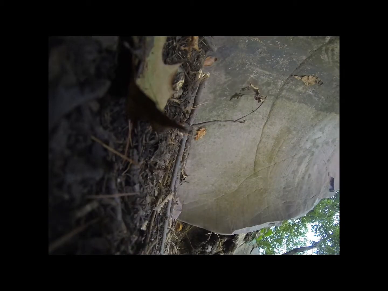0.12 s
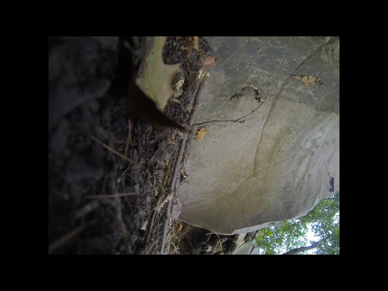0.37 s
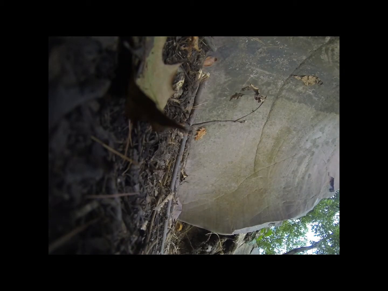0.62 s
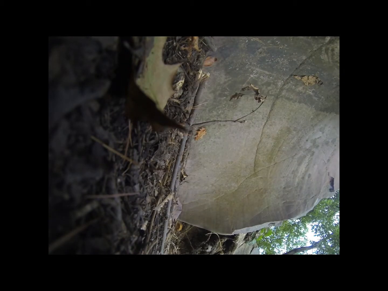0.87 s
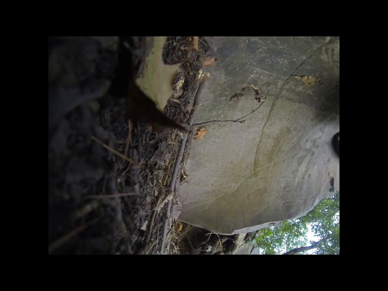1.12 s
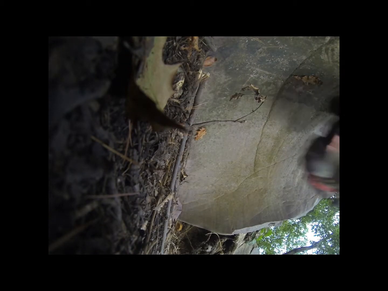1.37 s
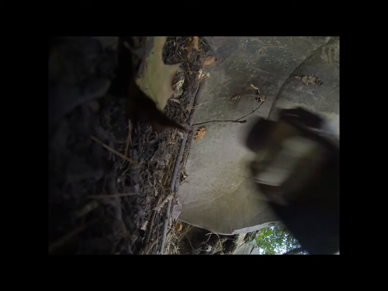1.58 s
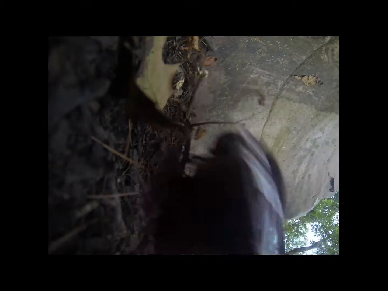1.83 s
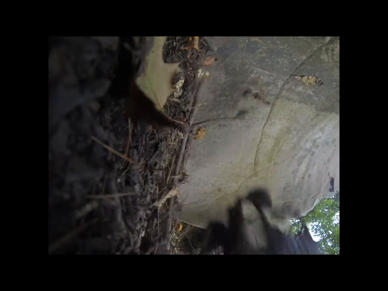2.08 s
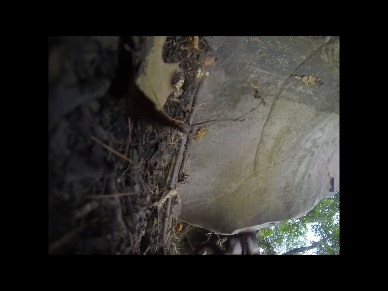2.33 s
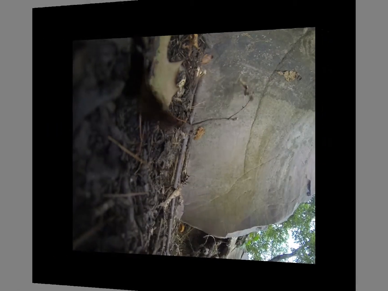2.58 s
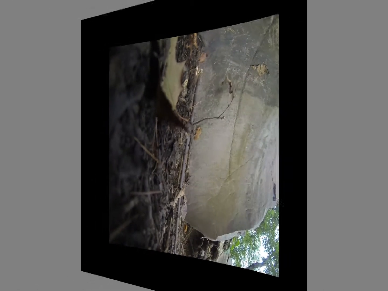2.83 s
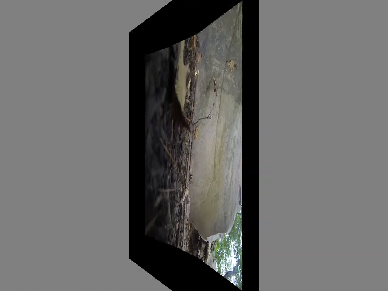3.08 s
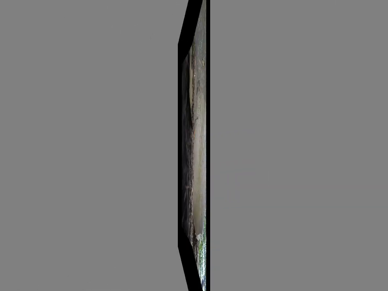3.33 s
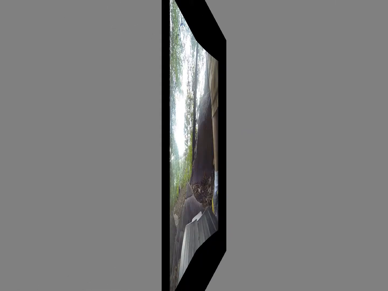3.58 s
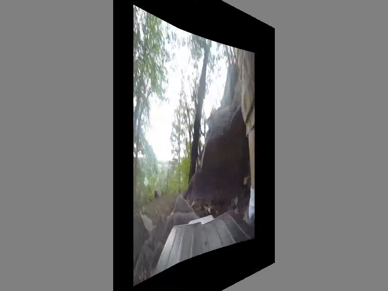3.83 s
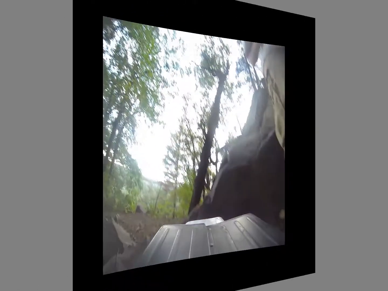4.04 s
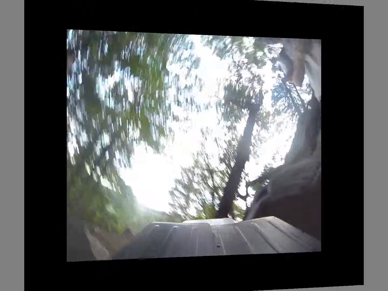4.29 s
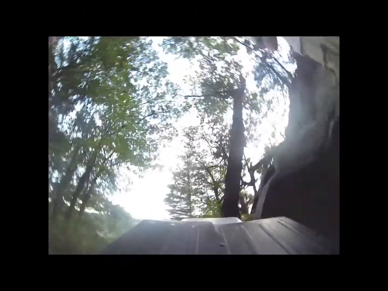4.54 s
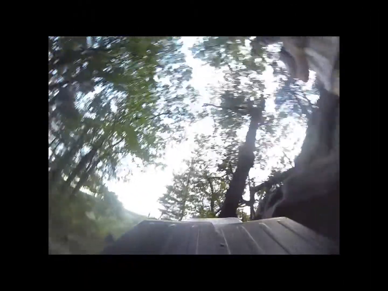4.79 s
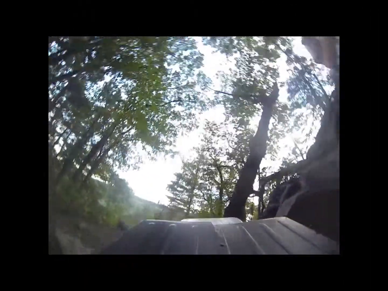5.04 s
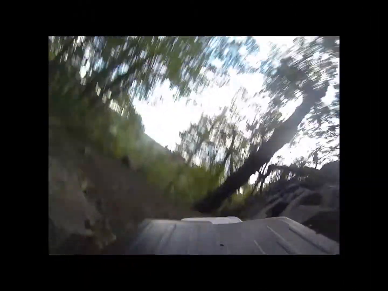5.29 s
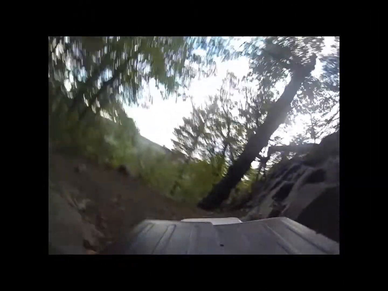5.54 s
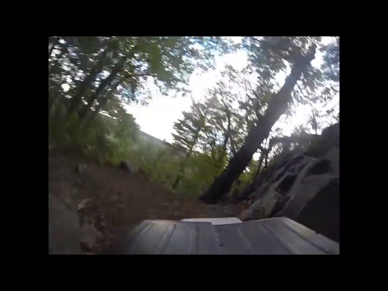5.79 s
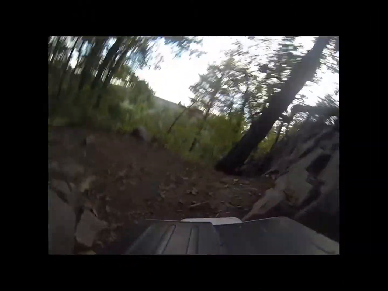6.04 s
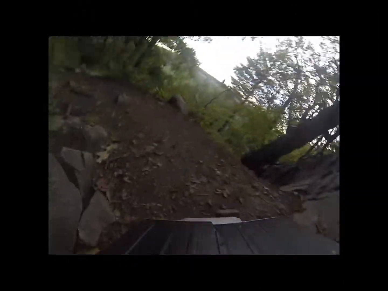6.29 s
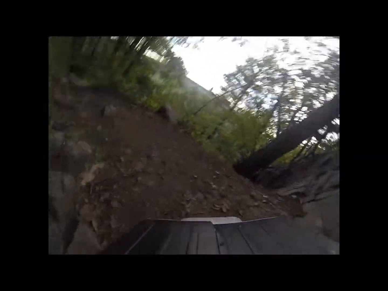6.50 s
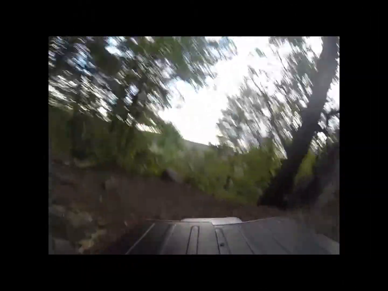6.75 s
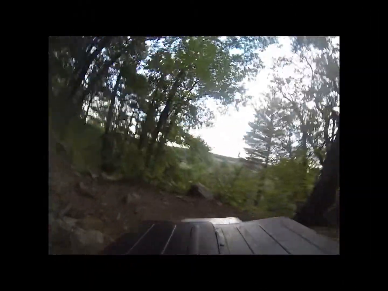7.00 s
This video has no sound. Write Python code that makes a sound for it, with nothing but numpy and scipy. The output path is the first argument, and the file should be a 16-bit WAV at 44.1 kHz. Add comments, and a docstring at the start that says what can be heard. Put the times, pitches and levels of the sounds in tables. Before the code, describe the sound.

Sound is muffled and boxy, picked up inside a shut plastic case on a rocky trail. From 0 to 3.5 seconds all is slowed and dull: faint bassy hiss and a thin pulsing whine, with small scuffs and ticks. Around 0.8 a modest thud, scrape and stone clack; little taps follow at 1.1 to 1.7. At 1.8 to 1.9 the toy truck passes in a loud crush of scraping, low thuds and ringing plastic clatter, fading by 2.1. Faint scrapes and taps near 2.6 to 2.9, then almost quiet. At about 3.5 the onboard ride swells in quickly, full and bright: shaking low rumble, chassis drone, tyres grinding, grit, and whirring gears squeaking most at 3.8 to 4.3. From 4.2 hollow case knocks come thick and irregular. The rumble dips and surges over stones, lighter around 6.2 to 6.4, with strong knocks at 6.5 and 6.8, still rolling at 7.1.

```python
"""A toy crawler truck on a rocky trail, heard by a small camera in a closed plastic case, in two shots.
First, slowed down: the truck scrapes and thuds past the camera on the ground, flicking stones and twigs at it.
Then, at speed, the camera rides on the truck: its mount shakes, tyres and grit rub, gears grind and squeak,
and the loose case knocks. Rubbing and knocks ring the case; shaped noise makes the thuds, drone and hiss.
The camera's circuit whines faintly in both shots, a tone in quick bursts."""
import sys
import numpy as np
from scipy import signal
from scipy.fft import rfft, irfft, next_fast_len
from scipy.io import wavfile
from scipy.ndimage import uniform_filter1d

SR = 44100
rng = np.random.default_rng(int(sys.argv[2]) if len(sys.argv) > 2 else 0)


def natural_amplitude(level_db):
    """Convert a level in decibels to a linear amplitude factor, elementwise."""
    exponent = np.asarray(level_db, float) / 20
    return 10 ** exponent


def output_pcm(signal):
    """Save a mono or channel-first signal as 16-bit PCM at the path in sys.argv[1].

    Samples are clipped to [-1, 1] before scaling.
    """
    pcm = np.clip(np.atleast_2d(signal).T, -1, 1) * 32767
    wavfile.write(sys.argv[1], SR, np.round(pcm).astype(np.int16))


N = 314433  # samples
T = np.arange(N) / SR  # seconds
SLOWDOWN, CUT_S = 2.5, 3.472  # first shot: times slower than life, and its end


def curves(rows):
    """The columns of a table, joined by straight lines in time."""
    time_s, *columns = np.transpose(rows)
    return [np.interp(T, time_s, column) for column in columns]


def unit(x):
    """Scales a sound to rms 1."""
    return x / np.sqrt(np.mean(x ** 2))


def coloured(points):
    """Noise whose spectrum follows (pitch_hz, level_db) points, at rms 1."""
    hz, db = np.transpose(points)
    f = np.arange(N // 2 + 1) * SR / N + 1
    shape = natural_amplitude(np.interp(np.log(f), np.log(hz), db, -90, -90))
    return unit(irfft(rfft(rng.standard_normal(N)) * shape, N))


def walk(rate):
    """Random levels, a new one rate times a second with a straight slide between; spread near 1."""
    k = int(SR / rate)
    steps = np.repeat(rng.standard_normal(N // k + 1), k)
    return unit(uniform_filter1d(steps, k)[:N])


def swells(rows, rise_db_s, rest_db):
    """Level in dB of (peak_s, level_db, fade_db_per_s) events that rise and die away over a resting level."""
    power = natural_amplitude(rest_db) ** 2 + np.zeros(N)
    for s, db, fade_db_s in rows:
        below_peak_db = np.where(T < s, rise_db_s * (s - T), fade_db_s * (T - s))
        power += natural_amplitude(db - below_peak_db) ** 2
    return 10 * np.log10(power)


def ring_of(modes, low_hz, high_hz, rise_cycles):
    """The answer to a tap of the modes between two pitches; the soft plastic takes a moment to give way."""
    t = np.arange(4096) / SR
    ring = np.zeros(4096)
    for k, (hz, width_hz, db) in enumerate(modes):
        if low_hz < hz < high_hz:
            give = (1 - np.exp(-hz * t / rise_cycles)) ** 2
            fade = np.exp(-np.pi * width_hz * t)
            ring += (-1) ** k * natural_amplitude(db) * give * fade * np.sin(2 * np.pi * hz * t)
    return ring / np.abs(ring).max()


def rubbing(ring, per_s, spread):
    """Tiny contacts of very unequal size (spread in dB) ring the case, at rms 1."""
    size = natural_amplitude(spread * np.minimum(rng.exponential(1, N), 4)) * rng.standard_normal(N)
    contacts = size * (rng.random(N) < per_s / SR)
    return unit(signal.fftconvolve(contacts, ring)[:N])


def taps(rows, low, high, chatter):
    """A firm first contact, then a chatter that dies away; both sets of modes get the same push."""
    out, t = np.zeros(N + 8192), np.arange(4096) / SR
    chance = rng.standard_normal((len(rows), 4096))
    for (s, db, treble_db, ms), noise in zip(rows, chance):
        push = (t == 0) + chatter * noise * np.exp(-t * 1000 / max(ms, .1))
        dull = signal.fftconvolve(push, low)
        bright = signal.fftconvolve(push, high)
        sound = dull / np.abs(dull).max() + natural_amplitude(treble_db) * bright / np.abs(bright).max()
        out[int(s * SR):][:len(sound)] += natural_amplitude(db) * sound
    return out[:N]


# Resonances of the case lying on the ground, as heard slowed: pitch_hz, width_hz, level_db (relative)
GROUND_RESONANCES = [(262.4, 60, -12.5), (445, 47, -9), (530, 75, -1), (587, 55.6, -2), (689.5, 58.4, -1),
                     (844, 66, -14), (945, 107, -6.5), (1400, 130, 3), (1560, 91, -3.5), (1770, 280, -2.5),
                     (2264, 60, -7.5), (2598, 140, -6), (3047, 120, -10), (3590, 340, -13),
                     (4350, 190, -23), (5130, 190, -25.5)]


def ground_case_rings():
    """The plastic case on the ground rings at set pitches when touched: a low and a high group."""
    return ring_of(GROUND_RESONANCES, 0, 1150, .2), ring_of(GROUND_RESONANCES, 1150, SR, .2)


# Shell and tyres meeting the rock, slowed: peak_s, scrape_db, brightness_db (treble over scrape),
# weight_db (body over scrape), fade_db_per_s
ROCK_SCRAPES = [(0.0, -40, -15, -5, 110), (0.39, -48, -18.5, -1.5, 90), (0.47, -53, -26, -3, 161),
                (0.6, -48.5, -13, -13, 250), (0.7, -61, -28, -4, 293), (0.75, -43, -6, -7.5, 102),
                (0.787, -30, -9, 3, 80), (0.9, -35, -20, 3, 125), (1.086, -45, -5, 0, 299),
                (1.12, -43.5, -16, -8, 248), (1.2, -57, -3, 6, 84), (1.29, -53, -10, -14, 200),
                (1.51, -55.5, -10, -4, 206), (1.662, -48, -8.5, 5, 99), (1.74, -43.5, -10, -6, 151),
                (1.781, -29, -9.5, -3.5, 201), (1.825, -15.5, -12, -2.5, 132), (1.92, -24.5, -24, -8, 211),
                (1.99, -36.5, -16.5, -2, 98.5), (2.029, -32.5, -22, -0.5, 169),
                (2.101, -44.5, -11, -8, 118.5), (2.32, -62.5, -12, -15, 151.5),
                (2.63, -69, -9.5, 0.5, 147.5), (2.71, -60, -6, 14.5, 120), (2.83, -43.5, -11.5, -4.5, 99.5),
                (2.869, -38.5, -15, -1.5, 122), (3.19, -50, -8, -7.5, 45), (3.28, -57, -19, -15, 197),
                (3.33, -47.5, -9, -15, 27.5), (3.46, -46.5, -6, -26, 47.5)]


def scrapes(low, high):
    """Tyres and shell rub the rock in many tiny contacts, with a noisy body under them."""
    rise_db_s = 898.5
    scrape_db = swells([(s, db, fade) for s, db, _, _, fade in ROCK_SCRAPES], rise_db_s, -72)
    # the treble fades 1.2 times as fast
    treble_rows = [(s, db + bright, fade * 1.2) for s, db, bright, _, fade in ROCK_SCRAPES]
    treble_db = swells(treble_rows, rise_db_s, -85.5)
    body_db = swells([(s, db + weight, fade) for s, db, _, weight, fade in ROCK_SCRAPES], rise_db_s, -73)
    scuff_db = 2.5 * walk(45)  # the shell catches and lets go
    dull = natural_amplitude(scrape_db + scuff_db) * rubbing(low, 1500, 4.0)
    bright = natural_amplitude(treble_db + scuff_db) * rubbing(high, 3000, 0.94)
    body = coloured([(100, -47.5), (160, -3.5), (250, -0.5), (330, 5.5), (450, -11.5), (700, 11.0)])
    return dull + bright + natural_amplitude(body_db) * body


# The truck landing: peak_s, level_db, fade_db_per_s
LANDINGS = [(0.0, -45, 300), (0.785, -29, 898), (1.15, -50, 97), (1.785, -32.5, 99.5), (1.82, -26, 99.5),
            (1.9, -20, 301), (2.03, -47, 250), (2.63, -52.5, 300), (2.74, -46.5, 99), (3.3, -53.5, 297)]


def thuds():
    """The truck's landings come through the ground as short swells of low noise."""
    rumble = coloured([(15, -4), (40, -2.5), (90, -6.5), (150, -18.0), (250, -45)])
    return natural_amplitude(swells(LANDINGS, rise_db_s=1199, rest_db=-64.5)) * rumble


# Colour of the slowed hiss: pitch_hz, level_db (per Hz, relative)
SLOWED_HISS = [(25, -9), (170, -18.5), (520, -19), (660, -18), (800, -23), (1700, -31.5), (3000, -34),
               (4500, -47), (5300, -44), (5500, -81.5)]


def slowed_hiss():
    """A steady faint noise, strongest in the bass."""
    return natural_amplitude(-60.5) * coloured(SLOWED_HISS)


def whine(slow, centre_s, db, octave_db):
    """The circuit's tone leaks in bursts, once a picture; slowing lowers both its pitch and burst rate."""
    bursts_per_s, burst_share, whine_hz = 47.95 / slow, .4, 6449.5 / slow
    phase = (T - centre_s) * bursts_per_s
    inside = np.abs(phase - np.round(phase)) < burst_share / 2
    on = uniform_filter1d(1. * inside, int(20 * slow))  # softened edges
    turn = 2 * np.pi * whine_hz * T
    return natural_amplitude(db) * on * (np.sin(turn) + natural_amplitude(octave_db) * np.sin(2 * turn))


# Stones and twigs flicked against the case, slowed: start_s, level_db, treble_db (over the dull part),
# chatter_ms (time to fade to about a third)
STONE_FLICKS = [(0.37, -42.5, -7, 7.4), (0.749, -37.5, 4, 6), (0.78, -24, -0.5, 22),
                (0.801, -11.5, -11, 13), (0.851, -18.5, -16, 14), (0.875, -24, -36, 5.7),
                (1.092, -38, 2.5, 6.9), (1.121, -26, -38, 13), (1.259, -38.5, -12, 5),
                (1.363, -23, -9, 2.7), (1.663, -31, -11.5, 10), (1.78, -5, -5.5, 9),
                (1.793, -9.5, -27, 9.3), (1.816, -9, -0.5, 9.8), (1.822, -4, -4, 4.7),
                (1.832, 1, -7.5, 15.5), (1.844, -3.5, -16, 21), (1.862, -5.5, -8.5, 8.6),
                (1.929, -19.5, -15, 15), (2.028, -33.5, -8, 7.1), (2.094, -58, 15, 8.9),
                (2.486, -43.5, -17, 7.6), (2.612, -45, 1, 4.6), (2.709, -41, -27, 12),
                (2.877, -34.5, -6.5, 16), (3.189, -54, 13.5, 13.5), (3.361, -40, -5, 12)]


def flicks(low, high):
    """Stones and twigs strike the case and chatter briefly, making it ring."""
    return taps(STONE_FLICKS, low, high, chatter=0.24)


def slowed_shot():
    """Scrapes, thuds, hiss and flicks; slowing pulls the top of the microphone's range down too."""
    low, high = ground_case_rings()
    x = scrapes(low, high) + thuds() + slowed_hiss() + flicks(low, high)
    return signal.sosfilt(signal.butter(8, 5900, fs=SR, output="sos"), x)


# How hard the wheels work the ground: time_s, level_db
ROLLING_LEVEL = [(3.47, -41.5), (3.52, -23), (3.6, -7), (3.65, -1.5), (3.69, 0.5), (4.2, 2), (4.6, -1),
                 (5.0, -0.5), (5.5, -3), (6.1, -2), (6.3, -8.5), (6.45, -4.5), (6.6, -1), (6.85, -2),
                 (7.13, -6.5)]
# The wheels go light over a crest: middle_s, half_length_s, depth_db
CREST_LIFTS = [(4.383, 0.058, 13.5), (4.449, .03, 9.5), (4.681, 0.1, 3), (5.042, 0.065, 3),
               (5.189, 0.066, 6.5), (5.333, 0.052, 10), (5.416, 0.064, 9.5), (5.537, 0.039, 7.5),
               (5.89, 0.066, 8.5), (6.181, .05, 8.5), (6.409, 0.062, 5), (6.883, 0.066, 3.5),
               (7.004, .05, 13.5)]


def wheel_load():
    """The rolling level in dB, dipping where the wheels go light."""
    load_db = curves(ROLLING_LEVEL)[0]
    for s, half_length, depth_db in CREST_LIFTS:
        load_db = load_db - depth_db * np.cos(np.pi * np.clip((T - s) / half_length, -1, 1) / 2) ** 2
    return load_db


# Wheels hitting stones: peak_s, heave_db (of the mount), grind_db (under the tyres), over the rolling level
STONE_BUMPS = [(3.682, 13, 6), (3.81, 3.5, 3), (3.87, -7, 3.5), (3.941, 9.5, 3), (4.05, 7, -3),
               (4.241, 4, 4), (4.33, 9.5, 8), (4.42, 7.5, -1.5), (4.468, 5.5, 9), (4.509, 3, 9.5),
               (4.6, 3.5, -3), (4.73, 6, -1.5), (4.79, 2.5, -1), (4.949, 5, 3), (5.16, 12.5, 7.5),
               (5.229, 6, 9), (5.261, 2.5, 8.5), (5.299, 11.5, 2), (5.37, 3, 7.5), (5.452, 13.5, 8.5),
               (5.5, 9.5, -5), (5.56, 4.5, 8.5), (5.599, 7.5, 7), (5.7, 3, -8), (5.79, 1, 6),
               (5.841, 10.5, 4), (5.96, 2, 1), (6.011, 9, 7), (6.068, 6.5, 4.5), (6.148, 16, 6),
               (6.228, 12, -12), (6.29, 5.5, -1.5), (6.46, -3.5, 4.5), (6.511, 12.5, 14.5),
               (6.548, -0.5, 12.5), (6.6, 9.5, -9), (6.691, -2, 8), (6.77, 4, 11.5), (6.835, 4, 0.5),
               (6.969, 13.5, 9.5), (7.05, -1, 1)]


def wheel_bumps():
    """Each stone lifts the levels in dB of the mount's heave and the tyres' grind above the wheel load."""
    load_db = wheel_load()
    heave_db = load_db + swells([(s, db, 253) for s, db, _ in STONE_BUMPS], 352, 0)
    grind_db = load_db + swells([(s, db, 204) for s, _, db in STONE_BUMPS], 700, 0)
    return heave_db, grind_db


# Colour of the mount's shaking: pitch_hz, level_db (per Hz, relative)
MOUNT_SHAKE = [(18, -36.5), (30, 3.5), (45, -2), (65, -10), (90, -19), (130, -60.5)]


def shaking(heave_db):
    """The sprung mount keeps swinging: its pitch wanders more than its size."""
    swing = coloured(MOUNT_SHAKE)
    size = uniform_filter1d(np.abs(signal.hilbert(swing, next_fast_len(N))[:N]), 600)
    return natural_amplitude(-16 + heave_db) * unit(swing / size ** 0.69)  # power 1 would make the size even


# Colour of the chassis drone: pitch_hz, level_db (per Hz, relative)
CHASSIS_DRONE = [(90, 0), (125, 3), (150, -4.5), (187, 0.5), (225, -9.5), (265, -3.5), (320, -4),
                 (400, -17.5), (600, -15.5)]


def drone(heave_db, grind_db):
    """The chassis hums as low noise that follows both heave and grind."""
    level_db = -33 + 0.46 * heave_db + 0.95 * grind_db
    return natural_amplitude(level_db + 2.0 * walk(30)) * coloured(CHASSIS_DRONE)


# Colour of the tyres: pitch_hz, level_db (per Hz, relative)
TYRE_COLOUR = [(250, -24), (420, -17), (560, 2.5), (750, -9.5), (950, -1), (1150, -6.5), (1500, -29.5)]


def tyres(grind_db):
    """Tyres grinding on the ground make a mid-pitched noise with a fluttering level."""
    return natural_amplitude(-45 + grind_db + 2 * walk(70)) * coloured(TYRE_COLOUR)


# Resonances of the case in its mount on the truck: pitch_hz, width_hz, level_db (relative)
MOUNTED_RESONANCES = [(583, 151, -1.5), (776, 69, -28), (1101, 78, -18), (1595, 230, 5.5),
                      (2122, 342, -0.5), (2368, 254, -4.5), (3110, 120, -9.5), (3090, 39, -20.5),
                      (3420, 240, -4.5), (3900, 300, -4.5), (4950, 360, -12.5), (5660, 210, -14.5),
                      (5910, 260, -21), (7030, 1660, -6), (9300, 2700, -27.5)]


def mounted_case_rings():
    """The case in its mount rings at set pitches: a low group, a high group and the top ones alone."""
    low = ring_of(MOUNTED_RESONANCES, 0, 2700, .2)
    high = ring_of(MOUNTED_RESONANCES, 2700, SR, .2)
    return low, high, ring_of(MOUNTED_RESONANCES, 4400, SR, .15)


def grit(grind_db, low, high, top):
    """Grit rings the case in dense tiny contacts, and lone flying chips tick it."""
    treble_db = -64 + 0.9 * grind_db
    dull = natural_amplitude(-42.5 + 1.2 * grind_db) * rubbing(low, 2200, 2.3)
    bright = natural_amplitude(treble_db) * rubbing(high, 4300, 4.0)
    chips = natural_amplitude(treble_db - 8.5) * rubbing(top, 55, 2.5)
    return dull + bright + chips


# Resonances of the gears: pitch_hz, width_hz
GEAR_RESONANCES = [(1255, 131), (1480, 170)]
# Gear mesh over time: time_s, load_db, mesh_hz
GEAR_MESH = [(3.47, -60, 1405), (3.57, -43, 1464), (3.65, -32, 1400), (3.72, -29.5, 1417),
             (3.86, -26.5, 1393), (4.0, -31.5, 1383), (4.09, -37.5, 1263), (4.19, -36, 1256),
             (4.34, -44.5, 1320), (4.53, -35.5, 1280), (4.66, -37, 1500), (4.74, -27, 1304),
             (4.96, -45, 1320), (5.33, -45.5, 1263), (5.6, -50.5, 1300), (5.78, -44, 1400),
             (5.97, -45.5, 1340), (6.08, -38, 1290), (6.2, -51.5, 1290), (6.51, -43, 1330),
             (6.67, -37, 1290), (6.84, -45, 1260), (7.04, -54, 1274), (7.1, -36, 1296)]


def gears():
    """Rough mesh noise rings two narrow resonances; the one nearer the mesh pitch rings louder."""
    out = np.zeros(N)
    load_db, mesh_hz = curves(GEAR_MESH)
    for hz, width_hz in GEAR_RESONANCES:
        level_db = load_db - 0.08 * np.abs(mesh_hz - hz)  # dB lost per Hz of detuning
        b, a = signal.iirpeak(hz, hz / width_hz, SR)
        once = signal.lfilter(b, a, rng.standard_normal(N))
        ring = signal.lfilter(b, a, once)
        out += natural_amplitude(level_db + 4 * walk(30)) * unit(ring)
    return out


# Colour of the hiss in the riding shot: pitch_hz, level_db (per Hz, relative)
RIDING_HISS = [(1500, -18.5), (2500, -9.5), (4000, -18.5), (5500, -8.5), (8000, -9.5), (11000, -37)]


def riding_hiss():
    """The microphone's steady faint hiss, mostly treble."""
    return natural_amplitude(-66.5) * coloured(RIDING_HISS)


# The loaded gears squeak: start_s, length_s, start_pitch_hz, end_pitch_hz, level_db
GEAR_SQUEAKS = [(3.782, 0.025, 1199, 1370, -24.5), (3.793, 0.078, 1420, 1560, -18.5),
                (4.097, 0.039, 1255, 1253, -17), (4.177, 0.071, 1233, 1298, -18.5),
                (4.182, 0.018, 1374, 1370, -17.5), (3.84, 0.049, 1540, 1690, -26),
                (4.251, 0.076, 1216, 1260, -22.5), (4.006, 0.04, 2120, 2100, -42.5),
                (4.066, 0.079, 2020, 2130, -44), (4.107, 0.036, 2440, 2280, -42.5),
                (4.134, 0.037, 2187, 2090, -40), (6.28, 0.019, 1500, 1490, -37.5),
                (6.332, 0.017, 1350, 1400, -36), (4.8, 0.036, 1560, 1560, -28.5),
                (5.241, 0.036, 1450, 1490, -26), (6.873, 0.027, 1400, 1350, -34)]


def squeaks():
    """Loaded gears give short gliding tones whose pitch and level waver."""
    out = np.zeros(N)
    waver, flutter = walk(150), natural_amplitude(2.5 * walk(120))
    for s, length, from_hz, to_hz, db in GEAR_SQUEAKS:
        at = np.clip((T - s) / length, 0, 1)
        pitch_hz = (from_hz + (to_hz - from_hz) * at) * (1 + 0.005 * waver)
        turn = 2 * np.pi * np.cumsum(pitch_hz) / SR
        out += natural_amplitude(db) * flutter * np.sin(np.pi * at) ** 1.1 * np.sin(turn)
    return out


# The case knocking in its mount: start_s, level_db, treble_db (over the dull part), jolt_db
CASE_KNOCKS = [(3.8521, -13, -43, -21), (4.2274, -21.5, -35, -17), (4.2389, -7, -22, -16),
               (4.2684, -27, -28, -20.5), (4.298, -5.5, -25, -19), (4.3307, -7, -16, -19.5),
               (4.353, -25.5, -21, -12), (4.4693, -16, -34, -23), (4.4853, -18.5, -20, -20.5),
               (4.5, -11.5, -7.5, -7.5), (4.5059, -10, -19, -7.5), (4.515, -14, -23, -14),
               (4.526, -29, -5, -22), (4.56, -36, -1, -17.5), (4.5768, -17.5, -15.5, -27),
               (4.6, -19, -19, -19), (4.618, -18, -28, -12.5), (4.6711, -24.5, -21, -7),
               (4.7153, -15, -19.5, -26), (4.7751, -4.5, -13.5, -14), (4.7798, -21.5, -3, -19),
               (4.9005, -10.5, -25, -11), (4.9302, -21.5, -18, -16.5), (4.9446, -10.5, -21, -9.5),
               (4.9912, -33, -7, -5.5), (5.0417, -18, -17.5, -20), (5.086, -19.5, -22, -10),
               (5.1406, -19, -16.5, -16), (5.2573, -26.5, -37, -11), (5.2842, -6, -24, -2.5),
               (5.3675, -15, -24, -16), (5.4552, -25, -26, -26), (5.4625, -40, -6.5, -25),
               (5.492, -43.5, -8, -25.5), (5.56, -20, -35, -23.5), (5.5667, -12, -18.5, -16),
               (5.5913, -30, -12, -15), (5.5997, -7, -18.5, -21.5), (5.6107, -36, -7, -18),
               (5.6396, -7, -10, -10), (5.6624, -21.5, -21, -12), (5.7473, -15, -23.5, -15),
               (5.782, -30, -25, -17), (5.796, -23.5, -30, -15), (5.8415, -9.5, -18.5, -15),
               (5.848, -33, -10, -7), (5.9506, -11.5, -17, -14), (5.9938, -19, -31, -12),
               (6.0078, -21, -16, -15), (6.045, -11, -17, -5), (6.0639, -16.5, -20, -27),
               (6.094, -17.5, -36, -8), (6.1198, -26, -15.5, -15.5), (6.136, -19, -18.5, -11),
               (6.1474, -29, -31, -17), (6.283, -32, -39, -27), (6.4502, -31, -14.5, -23),
               (6.4866, -2, -20.5, -25), (6.4925, -9, -26, -19), (6.5916, -8.5, -22, -16),
               (6.6238, -12.5, -18.5, -18), (6.6919, -8, -20, -5.5), (6.742, -12, -21.5, -13),
               (6.7668, -16, -26, -16), (6.7705, -7.5, -19, -15), (6.7787, -9, -18, -9),
               (6.7896, -10, -16, -21), (6.8073, -17, -16.5, -22), (6.9428, -13, -27, -22.5),
               (6.9558, -8, -16, -36), (6.977, -16.5, -17, -13.5), (7.0393, -16.5, -17.5, -7.5),
               (7.066, -16.5, -17.5, -15)]


def jolts():
    """Each knock ends an upward swing of the case, which then drops back: one low cycle."""
    kicks = np.zeros(N)
    for s, *_, jolt_db in CASE_KNOCKS:
        kicks[int(s * SR)] = natural_amplitude(jolt_db)
    t = np.arange(-.05, .05, 1 / SR)
    swing = np.cos(2 * np.pi * 43 * t + 0.48) * np.exp(-((t - .004) / 0.0088) ** 2)
    return signal.fftconvolve(kicks, swing, "same")


def knocks(low, high):
    """The loose case hits its mount and rings, with a chatter of varying length."""
    chatter_ms = 3.12 * np.exp(0.34 * rng.standard_normal(len(CASE_KNOCKS)))
    rows = [(s, db, treble_db, ms) for (s, db, treble_db, _), ms in zip(CASE_KNOCKS, chatter_ms)]
    return taps(rows, low, high, chatter=0.19)


def riding_shot():
    """Shake of the mount, chassis drone, tyres, grit through the case, gears and knocks."""
    heave_db, grind_db = wheel_bumps()
    low, high, top = mounted_case_rings()
    rolling = shaking(heave_db) + drone(heave_db, grind_db) + tyres(grind_db)
    rolling = rolling + grit(grind_db, low, high, top)
    return rolling + gears() + squeaks() + jolts() + knocks(low, high)


def gain_control(x, knee_db, slope, hold_s):
    """Gain that drops as the running loudness passes a knee and comes back slowly."""
    keep = np.exp(-1 / (hold_s * SR))
    loud = np.sqrt(signal.lfilter([1 - keep], [1, -keep], x ** 2) + 1e-12)
    return np.minimum(1, natural_amplitude(knee_db) / loud) ** slope


def scene():
    """The two shots back to back; the gain control turns steady faint sounds down under loud ones."""
    slowed, riding = slowed_shot(), riding_shot()
    slow_whine = whine(SLOWDOWN, .0202, db=-56.5, octave_db=-15)
    slowed = slowed + slow_whine * gain_control(slowed, -31, 1.0, 0.16)
    faint = whine(1, .0003, db=-55.5, octave_db=-38) + riding_hiss()
    riding = riding + faint * gain_control(riding, -21.5, 1.93, 1.0)
    return np.where(T < CUT_S, slowed, riding)[None]


def band_limit(x):
    """A steep low-pass at the top of the band."""
    return signal.sosfilt(signal.butter(12, 17000, fs=SR, output="sos"), x)


def record(dry):
    """Only the loudest peaks are rounded; the shut case keeps out the top."""
    rounded = dry / (1 + dry ** 6) ** (1 / 6)
    shut = signal.sosfilt(signal.butter(4, 8500, fs=SR, output="sos"), rounded)
    return band_limit(shut)


dry = scene()
out = record(dry)
output_pcm(out)
```